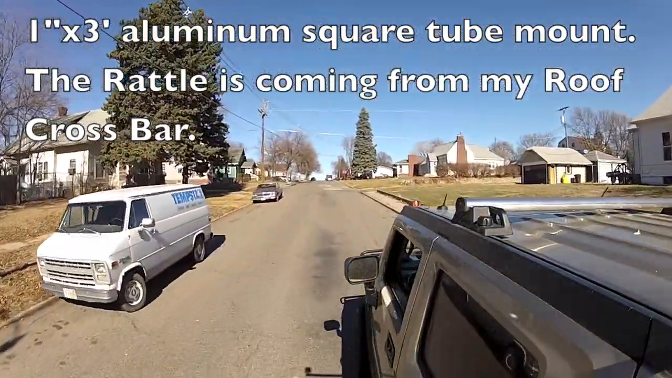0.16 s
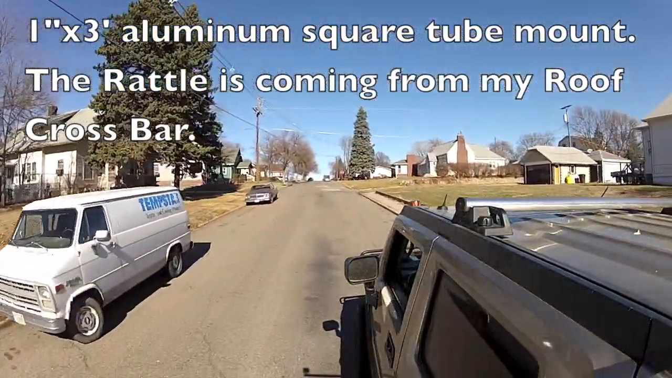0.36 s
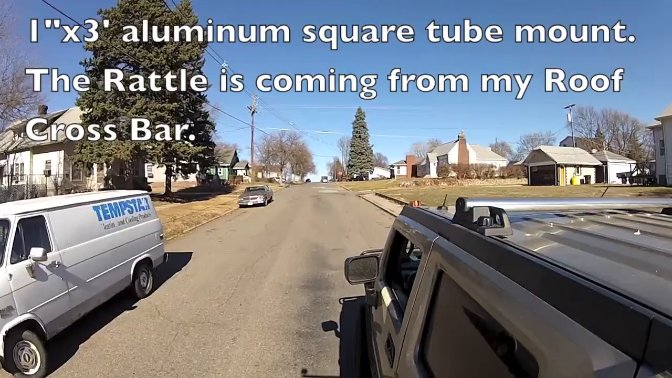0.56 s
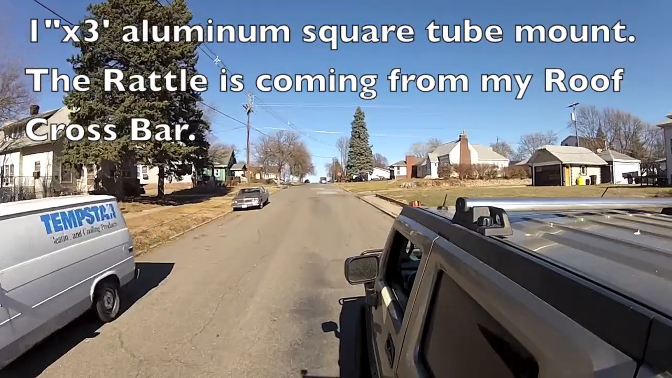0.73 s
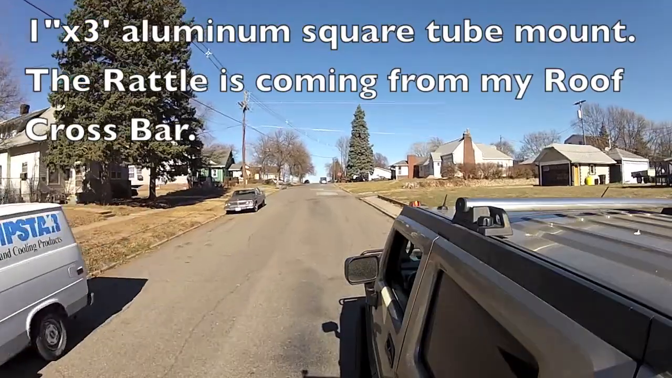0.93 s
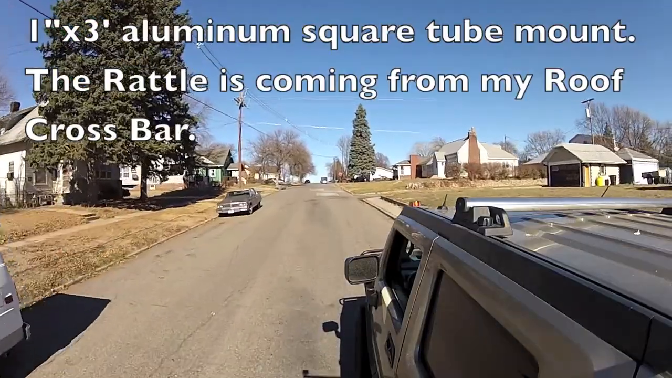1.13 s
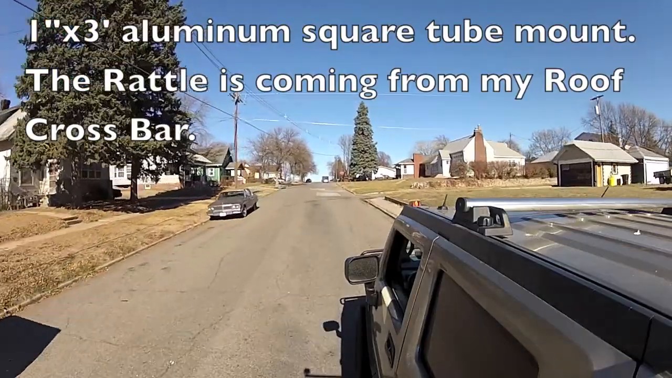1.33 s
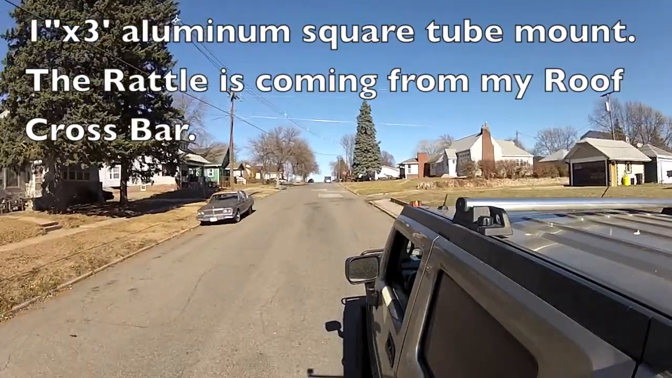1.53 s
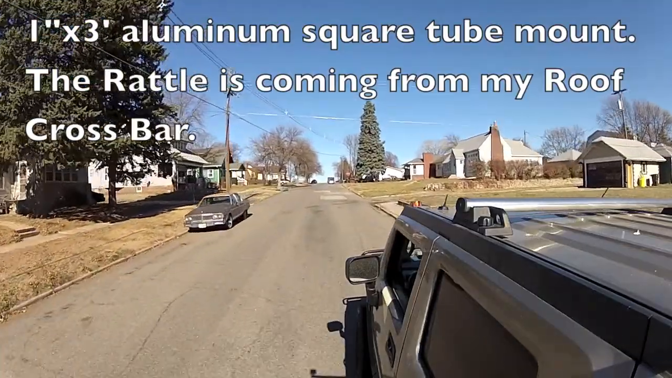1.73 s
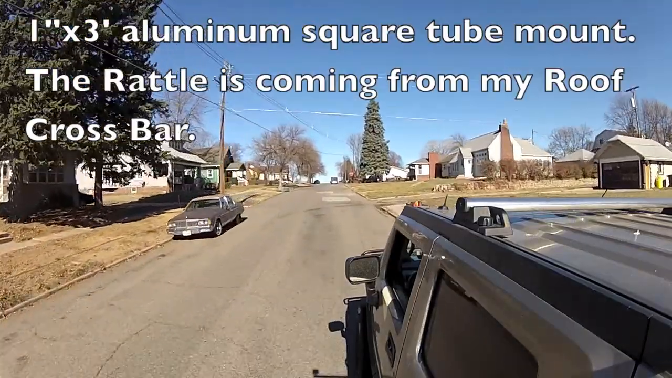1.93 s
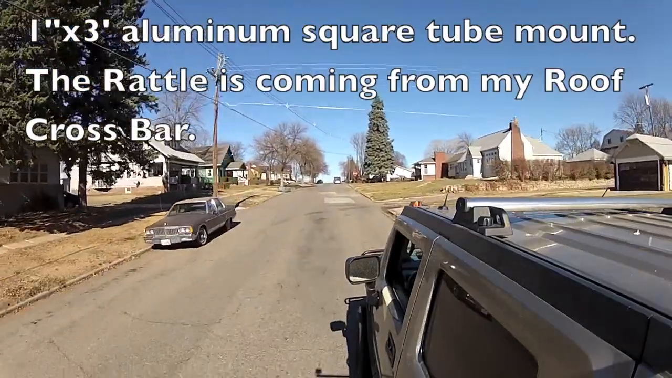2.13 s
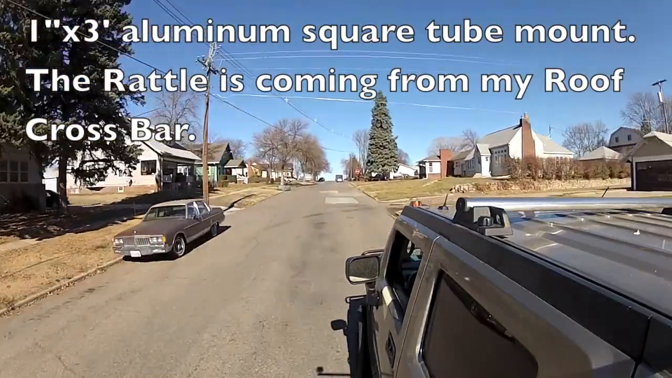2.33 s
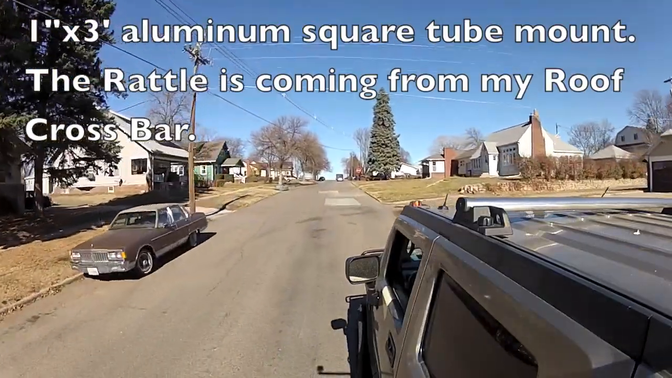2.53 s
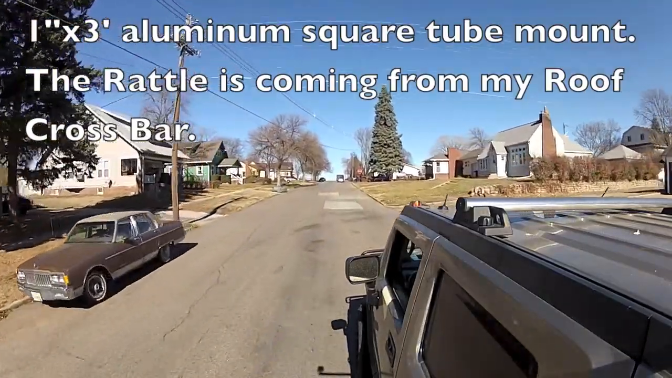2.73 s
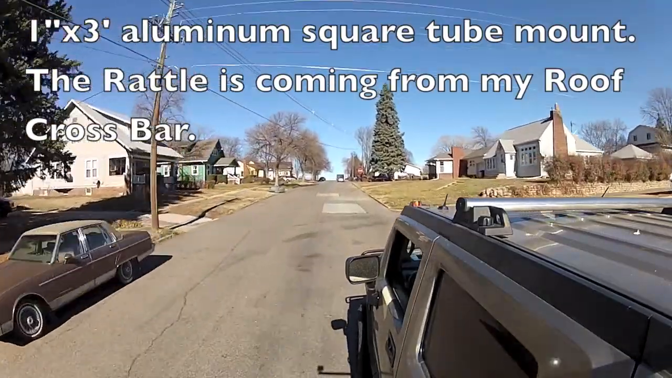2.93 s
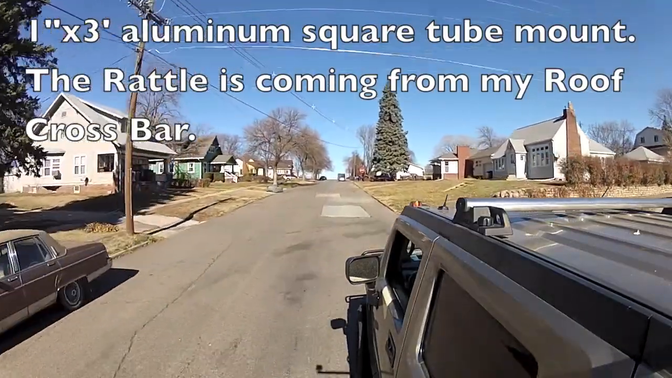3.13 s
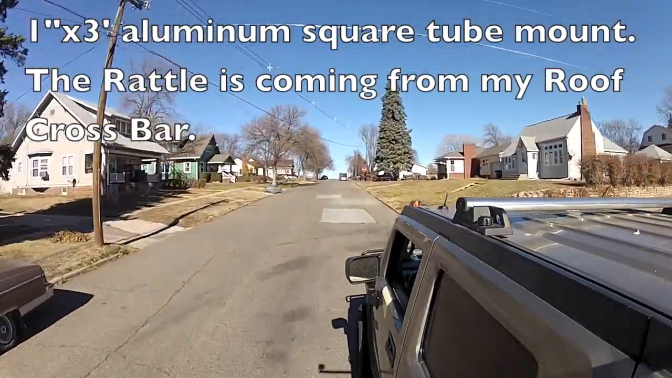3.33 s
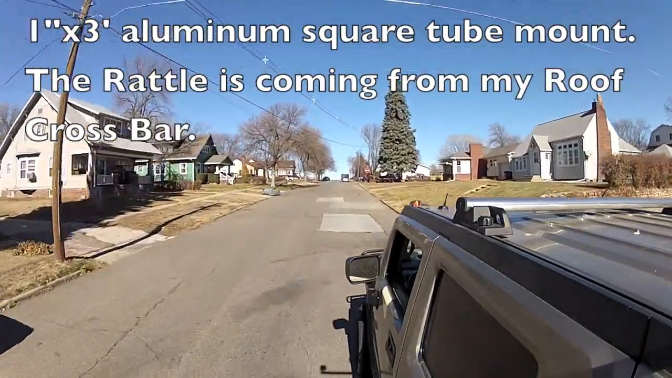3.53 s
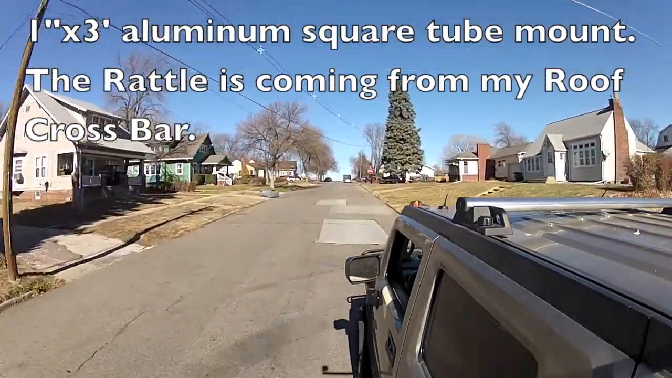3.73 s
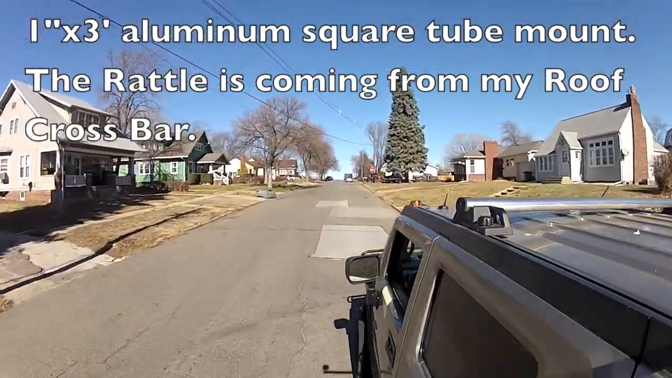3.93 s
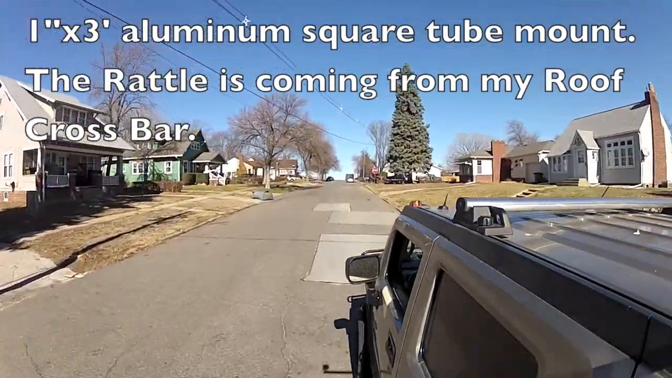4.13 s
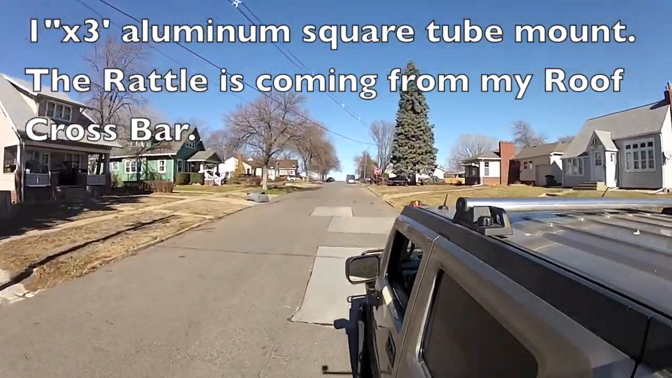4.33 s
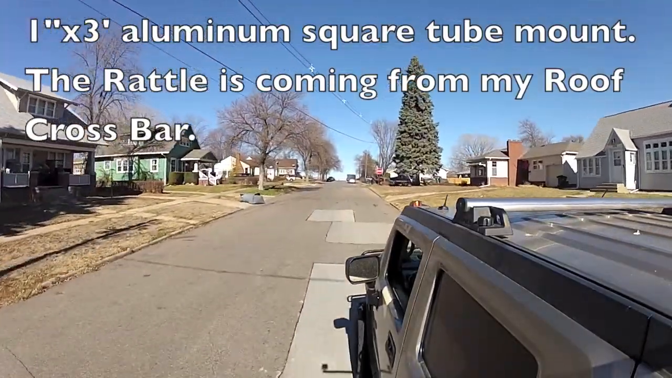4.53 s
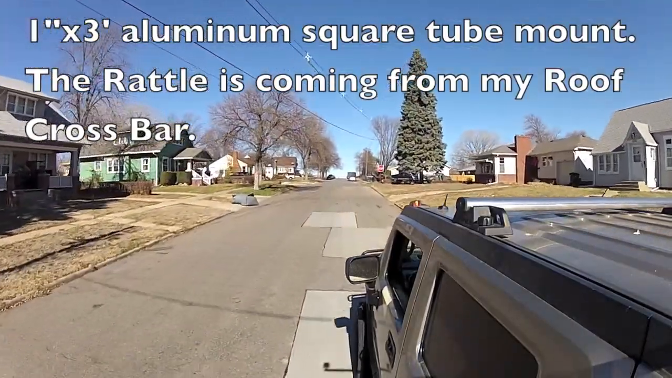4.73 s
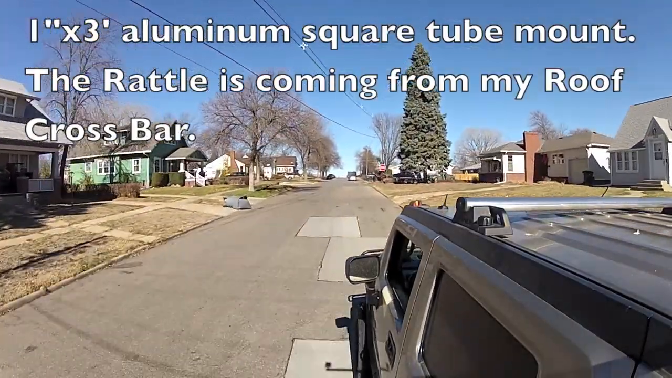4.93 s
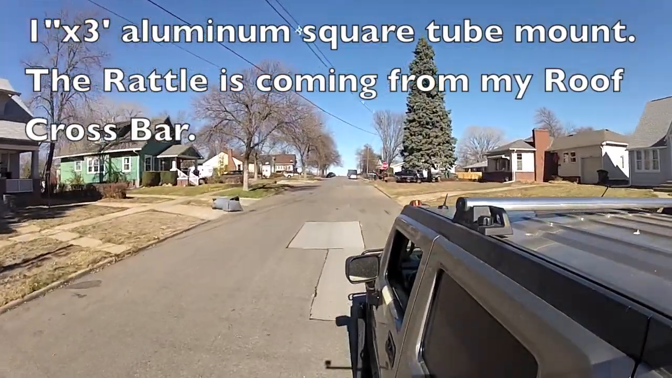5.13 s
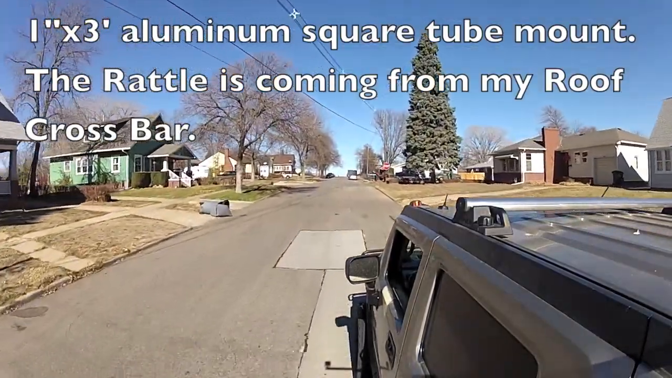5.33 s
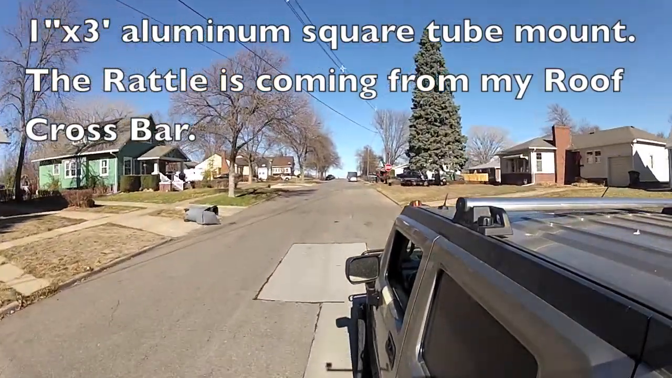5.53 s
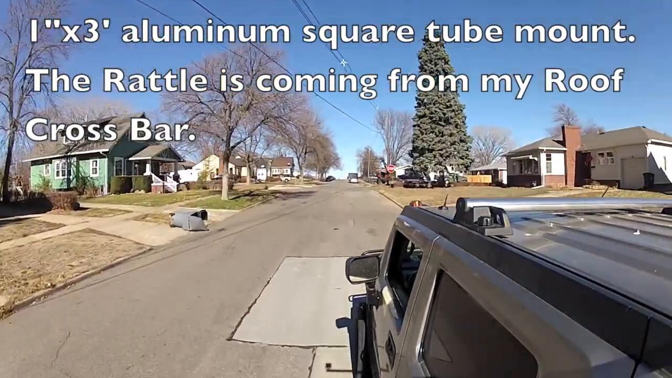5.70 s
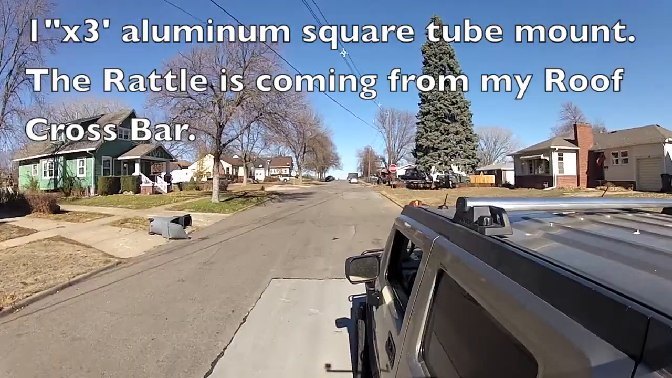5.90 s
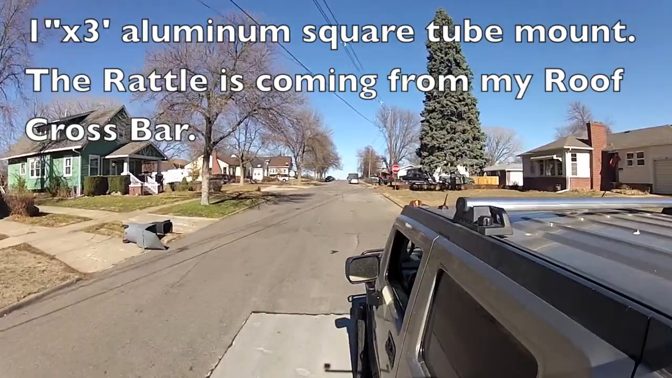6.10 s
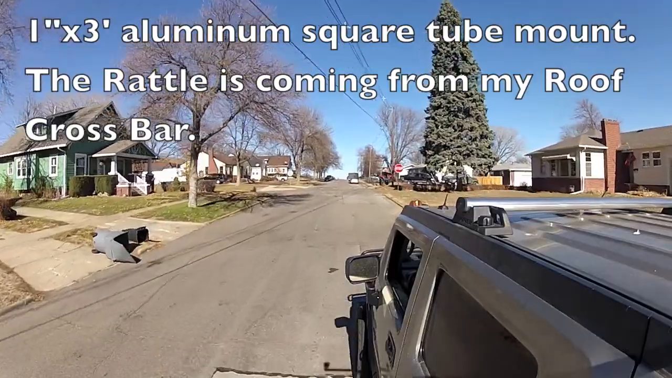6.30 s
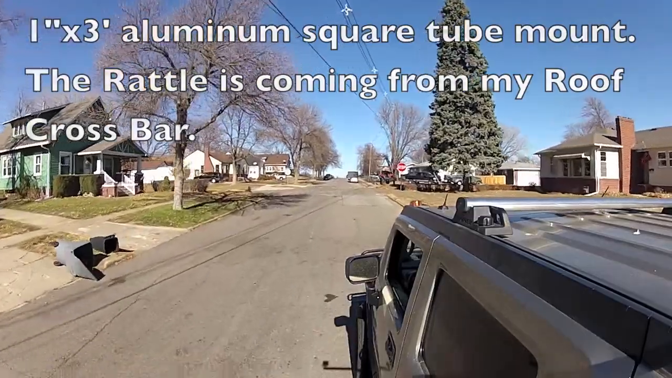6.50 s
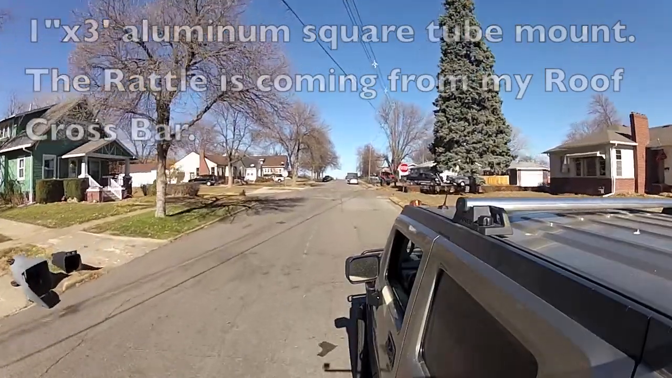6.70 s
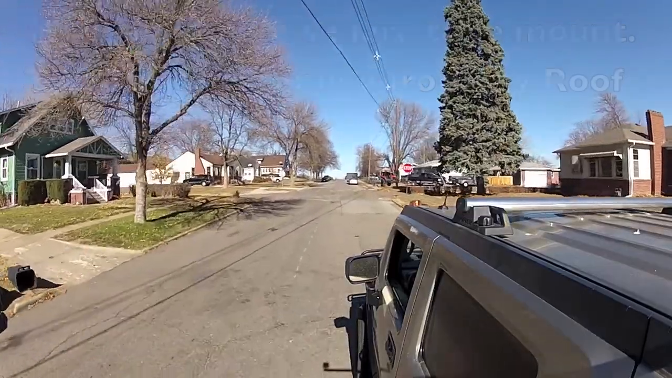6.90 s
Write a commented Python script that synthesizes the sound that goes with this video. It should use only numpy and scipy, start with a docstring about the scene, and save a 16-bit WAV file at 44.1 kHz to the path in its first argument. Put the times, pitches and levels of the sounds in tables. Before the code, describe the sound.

Engine drone and booming road noise from a moving vehicle's roof, with a loose metal bar clattering and wind rumbling more and more.

```python
"""An exhaust note climbs, then sinks at an upshift: a large off-road vehicle pulls along a street.
We ride on its roof rack, with the microphone on an aluminium tube. The cooling fan roars up, the road
shakes a boom out of the roof panels, and wind buffets the microphone. Boom and tyre noise throb with
each turn of the wheels, and on patched asphalt the loose cross bar knocks and rings in its clamps."""
import sys
import numpy as np
from scipy import signal
from scipy.fft import rfft, irfft, next_fast_len
from scipy.io import wavfile
from scipy.ndimage import uniform_filter1d, minimum_filter1d

SR = 44100
rng = np.random.default_rng(int(sys.argv[2]) if len(sys.argv) > 2 else 0)


def persist_wave(psi):
    """Save psi, clipped to +-1, as 16-bit WAV."""
    counts = np.round(np.clip(psi, -1, 1) * 32767).astype(np.int16)
    wavfile.write(sys.argv[1], SR, np.atleast_2d(counts).T)


N = 311346
TIME = np.arange(N) / SR

# Table levels are set before each layer's trim.
# exhaust note up to the upshift: t/s, firing f/Hz, level/dB
EXHAUST_NOTE = [(0.0, 119.5, -20), (0.26, 123.3, -15.5), (0.5, 132, -16), (0.6, 139.2, -23),
                (0.76, 146.4, -22.5), (1.21, 151.2, -29), (1.6, 162.6, -31), (1.93, 169, -27.5),
                (2.85, 166, -35.5), (3.05, 157.2, -24.5), (3.2, 137.6, -33)]
# engine overtones: multiple of the firing rate, level/dB
OVERTONES = [(2, 2.5), (2.5, -10), (3, 1), (3.5, -6), (4, -9.5), (5, -16), (6, -24)]
# fader for the drone of those overtones: t/s, level/dB
DRONE_LEVEL = [(0, -40.5), (0.7, -40.5), (2.0, -45.5), (4.3, -60), (5.0, -38), (5.35, -35.5), (5.9, -43),
               (6.35, -30), (6.7, -46)]
# exhaust pipe resonances: f/Hz, width/Hz, level/dB
PIPE_RESONANCES = [(323.6, 36, -1.5), (424, 59, -8), (525, 35, -3.5), (715, 50, 4.5)]
# hard knocks of the cross bar: t/s, level/dB, brightness/dB
HARD_KNOCKS = [(0.199, -24.5, -18.5), (0.482, -29, -8), (0.557, -29, -15), (0.595, -28.5, -18),
               (1.543, -22, -12), (1.573, -23, -14), (3.408, -20, -14), (3.973, -20.5, -11),
               (4.047, -13.5, -6), (4.263, -18, -8.5), (4.557, -3.5, -14.5), (4.641, -12, -9.5),
               (4.753, -17.5, -11), (4.848, -7.5, -15), (4.891, -11.5, -10.5), (4.954, -20, -14),
               (4.986, -15, -8.5), (5.022, -16.5, -9.5), (5.178, -18.5, -20.5), (5.232, -12.5, -8.5),
               (5.251, -19.5, -23), (5.322, -22, -7), (5.447, -18.5, -11), (5.527, -8.5, -13.5),
               (5.582, -17.5, -7), (5.627, -14.5, -9), (5.667, -14.5, -7.5), (5.718, -16, -15),
               (5.742, -13, -14.5), (5.799, -14.5, -15.5), (5.816, -11.5, -9.5), (5.872, -20.5, -8),
               (5.906, -11, -13), (6.146, -11.5, -16.5), (6.165, -16.5, -6.5), (6.24, -13.5, -7),
               (6.326, -14, -7), (6.379, -21, -12), (6.467, -25, -2), (6.514, -21.5, -3.5),
               (6.543, -19.5, -6), (6.598, -17.5, -18), (6.639, -11.5, -13), (6.707, -10.5, -11),
               (6.885, -15, -6), (6.895, -13, -14), (6.948, -22.5, -4), (7.035, -19.5, -17)]
# bending modes of bar and tube: f/Hz, level/dB, t60/s
BAR_MODES = [(268, -13.5, 0.077), (320, -9.5, 0.044), (433.4, -19.5, 0.13), (537, -11.5, 0.051),
             (648, -12.5, 0.065), (764, -18.5, 0.14), (916, -9.5, 0.034), (1030, -8.5, 0.057),
             (1128, -3, 0.047), (1149, -4, 0.022), (1434, -8, 0.048), (1566, -7, 0.02), (1662, 0.5, 0.019),
             (1783, -10.5, 0.019)]
# swell of the cooling fan and rushing air: t/s, level/dB
FAN_LEVEL = [(0.0, -55.5), (0.23, -53), (0.82, -48), (0.85, -44), (1.44, -43.5), (1.98, -33.5), (2.06, -28),
             (2.16, -35), (2.4, -31), (2.67, -37), (3.13, -34.5), (3.3, -34.5), (3.75, -33), (4.25, -35),
             (4.65, -40.5), (5.1, -43.5), (5.27, -39), (5.95, -41), (6.3, -38.5), (6.75, -43), (7.06, -43)]
# colour of the fan roar: f/Hz, level/dB
FAN_COLOUR = [(200, -1), (500, -13), (850, -10.5), (1100, -4), (1400, -2.5), (1700, -6.5), (2100, -6.5),
              (2500, -2.5), (2900, -6.5), (3300, -16.5), (3750, -17), (4200, -25.5), (5500, -26.5),
              (7000, -25.5)]
# colour of the booming panels: f/Hz, level/dB
BOOM_COLOUR = [(40, -27.5), (60, -5.5), (85, -20.5), (102, -0.5), (114, 4), (128, -3.5), (150, -9.5),
               (185, -24), (240, -44.5)]
# colour of the rolling tyres: f/Hz, level/dB
TYRE_COLOUR = [(130, -26.5), (185, 1), (230, -3.5), (275, 5.5), (335, 4), (400, -10), (550, -12), (700, -5),
               (830, -24), (1050, -4), (1300, -20), (1800, -20), (3000, -40.5)]
# roughness of the road: t/s, boom level/dB, tyre level/dB
ROAD_ROUGHNESS = [(0, -36.5, -45), (0.6, -29, -38), (1.3, -26, -38), (2.2, -23, -37), (2.7, -26, -36),
                  (3.8, -24.5, -38), (4.4, -26, -35.5), (4.7, -26.5, -33.5), (6.3, -28.5, -36.5),
                  (6.8, -31, -35.5)]
# the wheels hit seams and patch edges: t/s, boom level/dB, tyre level/dB
SEAM_JOLTS = [(1.25, -16.5, -49), (1.62, -18, -35.5), (2.44, -27, -36), (3.44, -20, -37),
              (3.78, -17, -35.5), (4.05, -23, -33.5), (4.58, -13.5, -23.5), (4.95, -12.5, -35),
              (5.32, -17, -27.5), (5.43, -20.5, -34), (5.52, -15, -27.5), (5.79, -21, -32),
              (6.11, -22.5, -32.5), (6.24, -22.5, -29.5), (6.34, -34, -27)]
# bed of wind on the microphone: t/s, level/dB
WIND_LEVEL = [(0, -29), (0.9, -23.5), (1.2, -27.5), (1.6, -21), (2.7, -21.5), (3.15, -18), (4.35, -22),
              (4.8, -19), (6.1, -18), (7.06, -20)]
# strong gusts: t/s, peak level/dB
WIND_GUSTS = [(3.07, -15.5), (3.19, -14), (3.42, -16.5), (4.59, -4), (4.7, -13), (4.91, -13), (5.41, -10.5),
              (5.8, -14.5), (6.38, -5), (6.56, -7.5), (6.87, -14), (7.0, -11)]
# colour of the wind rumble: f/Hz, level/dB
WIND_COLOUR = [(10, -39.5), (19, -6), (26, 0), (31, -1.5), (36, 3.5), (45, -8), (54, -22.5), (65, -37),
               (90, -20), (200, -37.5), (400, -72)]
# peaks and hollows of the plastic case around the microphone: f/Hz, width/Hz, level/dB
CASE_RESONANCES = [(410, 10, -8.5), (437.4, 15, 10.5), (551, 29, 6), (1007, 87, 3), (1909, 84, 8),
                   (2291, 110, 7.5), (3257, 42, 4.5), (3493, 90, 9.5), (3830, 120, 6), (4575, 130, 9),
                   (5480, 190, 8), (5950, 1170, -16.5)]


def exhaust(note_trim_db=2.5, cruise_db=-35.0, cruise_hz=112.65, ease_s=0.2458):
    """The firing note, with overtones droning through the pipe; the note recedes as the throttle eases."""
    firing_hz, note_db = automation(EXHAUST_NOTE)
    eased = np.clip((TIME - EXHAUST_NOTE[-1][0]) / ease_s, 0, 1)
    firing_hz += eased * (cruise_hz + drift(2.45) - firing_hz)
    note_db += eased * (cruise_db - note_db)
    phase = 2 * np.pi * np.cumsum(firing_hz) / SR
    note = from_db(note_trim_db + note_db + 1.4 * drift(18.4)) * np.sin(phase)
    overtones = sum(from_db(db + 4.5 * drift(7.6)) * np.sin(order * phase + rng.uniform(0, 2 * np.pi))
                    for order, db in OVERTONES)
    drone = sum(from_db(db) * resonance(overtones, hz, width) for hz, width, db in PIPE_RESONANCES)
    return note + from_db(automation(DRONE_LEVEL)[0]) * drone


def cross_bar(knocks, tyre_gain, trim_db=-6.0, rebound_db=-7, scuff_db=-9, scuff_s=0.0032):
    """Each knock rings the bar, scuffs and rebounds once; light chatter thickens on rough road."""
    times, knock_db, brightness_db = np.transpose(knocks)
    rebound_s = rng.uniform(0.00291, 0.00781, len(times))
    chatter_per_s = 45 * np.clip(tyre_gain * from_db(29.5), 0, 2) * (TIME > .5)
    chatter_hits = rng.random(N) < chatter_per_s / SR
    chatter = chatter_hits * tyre_gain * from_db(-0.5 + 2 * rng.standard_normal(N))
    fade = np.exp(-1 / (scuff_s * SR))
    clatter = np.zeros(N)
    for k, (hz, mode_db, t60) in enumerate(BAR_MODES):
        # bending waves are dispersive: high modes arrive first
        arrival = times + 0.0022 * (np.sqrt(1000 / hz) - 1)
        # a glancing contact favours the upper modes, a square one the lower
        tilt_db = (brightness_db + 10) * np.interp(hz, [1250, 1660], [-.6, .9])
        clicks = np.zeros(N)
        for delay, contact_db in ((0, 0), (rebound_s, rebound_db)):
            scatter_db = 1.7 * rng.uniform(-0.84, 1, len(times))
            onsets = ((arrival + delay) * SR).astype(int)
            clicks[onsets] += from_db(knock_db + tilt_db + contact_db + scatter_db)
        scuff_envelope = signal.lfilter([np.sqrt(1 - fade ** 2)], [1, -fade], clicks + 1e-18)
        scuff = from_db(scuff_db) * scuff_envelope * rng.standard_normal(N)
        clatter += from_db(mode_db) * ring((clicks + chatter) * (-1) ** k + scuff, hz, t60)
    # the contact is soft, so little rings above the top mode
    return from_db(trim_db) * signal.sosfilt(signal.butter(6, 2000, fs=SR, output="sos"), clatter)


def light_taps(throb, patched_from_s=4.4, level_db=-24, brightness_db=-12.5):
    """Extra knock rows: the bar taps at random on patched asphalt, thinning out in the wheels' lulls."""
    on_patches = (TIME > patched_from_s) * (TIME < TIME[-1] - .03)
    taps_per_s = 6 * (1 + throb) * on_patches
    times = TIME[rng.random(N) < taps_per_s / SR]
    softer, brighter = rng.uniform(-1, 1, (2, len(times)))
    return np.column_stack([times, level_db - 0.5 * softer, brightness_db + 8 * brighter])


def fan_roar(throb, trim_db=1.5, crossover_hz=1750, settle_s=0.34):
    """Roar of moving air: its body swells more slowly than its hiss; both dip a little with the wheels."""
    fan_db, = automation(FAN_LEVEL)
    air = noise(FAN_COLOUR)
    low_air = filtered(air, lambda hz: 1 / (1 + (hz / crossover_hz) ** 8))
    settled_db = uniform_filter1d(fan_db, int(settle_s * SR))
    body = from_db(settled_db + 1.17 + 0.6 * throb) * low_air
    hiss = from_db(fan_db + 0.42 * throb + 1.11 * drift(17)) * (air - low_air)
    return from_db(trim_db) * (hiss + body)


def body_boom(shake, trim_db=0.92, wobble_db=1.5):
    """The road shakes the roof panels into a deep, uneven boom."""
    return shake * from_db(trim_db + wobble_db * drift(8)) * levelled(noise(BOOM_COLOUR), span_s=0.063)


def wind_buffet(trim_db=-0.63, lumpy_db=3.0):
    """Lumpy rumble of wind on the microphone, rising with speed and swelling in gusts."""
    bed = from_db(automation(WIND_LEVEL)[0] + lumpy_db * drift(8))
    gusts = swells(*np.transpose(WIND_GUSTS), rise_s=0.048, fall_s=0.044)
    return from_db(trim_db) * np.hypot(bed, gusts) * levelled(noise(WIND_COLOUR), span_s=0.088)


def tyre_roll(tyre_gain, trim_db=-1.0, flutter_db=2.1):
    """Tyres on asphalt: a low, fluttering rush."""
    return tyre_gain * from_db(trim_db + flutter_db * drift(25)) * noise(TYRE_COLOUR)


def wheel_throb(wheel_hz=2.92, lull_at_s=5.06, sharpness=3.4):
    """A modulator within +-1 with one short lull per wheel turn, deepening as the vehicle gathers speed."""
    lull = np.abs(np.cos(np.pi * wheel_hz * (TIME - lull_at_s))) ** sharpness
    depth = np.interp(TIME, [1.63, 4.6], [0, 1])
    return depth * (1 - 2 * lull)


def road_gains(throb, rise_s=0.024, fall_s=0.042):
    """Envelopes for boom and tyres: road roughness throbbing with the wheels, plus jolts at the seams."""
    boom_db, tyre_db = automation(ROAD_ROUGHNESS)
    times, jolt_db, thump_db = np.transpose(SEAM_JOLTS)
    shake = np.hypot(from_db(boom_db + 4 * throb), swells(times, jolt_db, rise_s, fall_s))
    tyre_gain = np.hypot(from_db(tyre_db + 3.5 * throb), swells(times, thump_db, rise_s, fall_s))
    return shake, tyre_gain


def clamp_squeak(start_s=1.56, length_s=0.079, pitch_hz=1220, level_db=-33):
    """One short, stuttering stick-slip tone as the bar shifts."""
    slide = np.clip((TIME - start_s) / length_s, 0, 1)
    envelope = np.sqrt(4 * slide * (1 - slide)) * from_db(level_db + 3 * drift(60))
    wavering_hz = pitch_hz + 60.3 * drift(109.6)
    return envelope * np.sin(2 * np.pi * np.cumsum(wavering_hz) / SR)


def plastic_case(x):
    """The case around the microphone colours the sound with ringing peaks and hollows."""
    for hz, width, db in CASE_RESONANCES:
        x = x + (from_db(db) - 1) * resonance(x, hz, width)
    return x


def from_db(db):
    """Decibels to gain."""
    return 10 ** (np.asarray(db) / 20)


def automation(rows):
    """One curve at audio rate for each column after the time."""
    times, *columns = np.transpose(rows)
    return [np.interp(TIME, times, column) for column in columns]


def filtered(x, gain_at):
    """Equalise with a gain given as a function of frequency."""
    size = next_fast_len(N + SR // 4)
    hz = np.arange(size // 2 + 1) * SR / size + 1e-6
    return irfft(rfft(x, size) * gain_at(hz), size)[:N]


def rms_one(x):
    """Scale to rms 1."""
    return x / np.sqrt(np.mean(x ** 2) + 1e-20)


def drift(rate_hz):
    """A smooth random modulator of rms 1."""
    return rms_one(filtered(rng.standard_normal(N), lambda hz: 1 / (1 + (hz / rate_hz) ** 2)))


def noise(colour):
    """Noise of the given colour, rolling off above its last point; rms 1."""
    points_hz, db = np.transpose(colour)

    def gain_at(hz):
        roll_off = np.minimum(1, points_hz[-1] / hz) ** 3
        return from_db(np.interp(np.log(hz), np.log(points_hz), db)) * roll_off
    return rms_one(filtered(rng.standard_normal(N), gain_at))


def levelled(x, span_s):
    """Hold the short-term level of a noise near 1."""
    size = int(span_s * SR)
    return x / np.sqrt(uniform_filter1d(uniform_filter1d(x ** 2, size), size) + 1e-6)


def resonance(x, hz, width_hz):
    """A resonant band-pass with unity gain at its peak."""
    return signal.lfilter(*signal.iirpeak(hz, hz / width_hz, fs=SR), x)


def ring(clicks, hz, t60):
    """A unit click sets a decaying sine of height 1 ringing."""
    radius, angle = from_db(-60 / (t60 * SR)), 2 * np.pi * hz / SR
    return signal.lfilter([0, np.sin(angle)], [1, -2 * radius * np.cos(angle), radius ** 2], clicks + 1e-18)


def swells(times, peaks_db, rise_s, fall_s):
    """Envelope of a row of bell-shaped swells, summed in power."""
    power = np.zeros(N)
    for peak_s, db in zip(times, peaks_db):
        age = TIME - peak_s
        near = np.abs(age) < .4
        width_s = np.where(age[near] < 0, rise_s, fall_s)
        power[near] += (from_db(db) * np.exp(-(age[near] / width_s) ** 2)) ** 2
    return np.sqrt(power)


def scene():
    """The mono mix on the roof: engine, rattle, air and road."""
    throb = wheel_throb()
    shake, tyre_gain = road_gains(throb)
    fan_and_tyres = plastic_case(fan_roar(throb) + tyre_roll(tyre_gain))
    wind = wind_buffet()
    engine = exhaust()
    boom = body_boom(shake)
    squeak = clamp_squeak()
    rattle = cross_bar(np.vstack([HARD_KNOCKS, light_taps(throb)]), tyre_gain)
    return (engine + rattle + fan_and_tyres + boom + wind + squeak)[None]


def record(dry, ceiling=.9, mirror_hz=12000, cutoff_hz=15150):
    """Low cut, limiter, a faint mirror image in the treble from uneven sample timing, then high cut."""
    x = signal.sosfilt(signal.butter(4, 19, "high", fs=SR, output="sos"), dry[0])
    limiter_gain = minimum_filter1d(ceiling / np.maximum(np.abs(x), ceiling), size=801)
    x = x * uniform_filter1d(limiter_gain, size=801)
    # a timing error adds the slope of the wave times that error
    timing_error = from_db(5.0) * np.cos(2 * np.pi * mirror_hz * TIME)
    x = x + np.gradient(x) * timing_error
    x = signal.sosfilt(signal.butter(1, 13500, fs=SR, output="sos"), x)
    return signal.sosfilt(signal.ellip(12, .2, 80, cutoff_hz, fs=SR, output="sos"), x)[None]


dry = scene()
out = record(dry)
persist_wave(out)
```